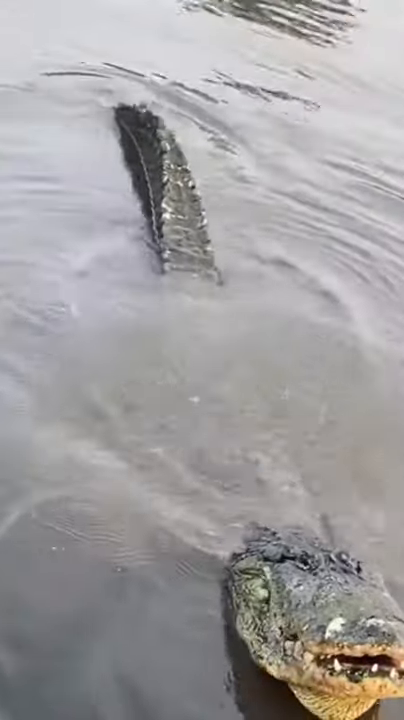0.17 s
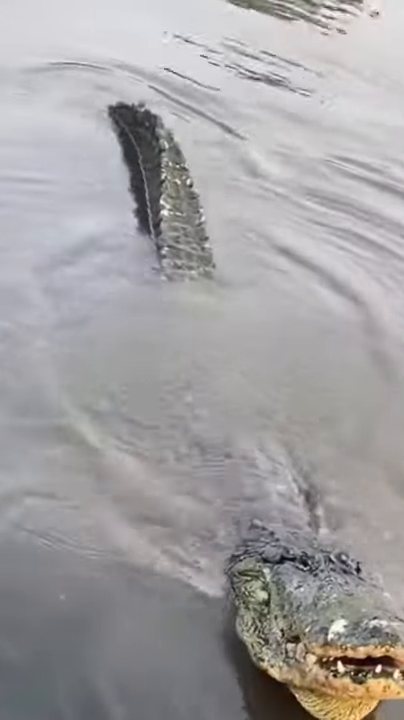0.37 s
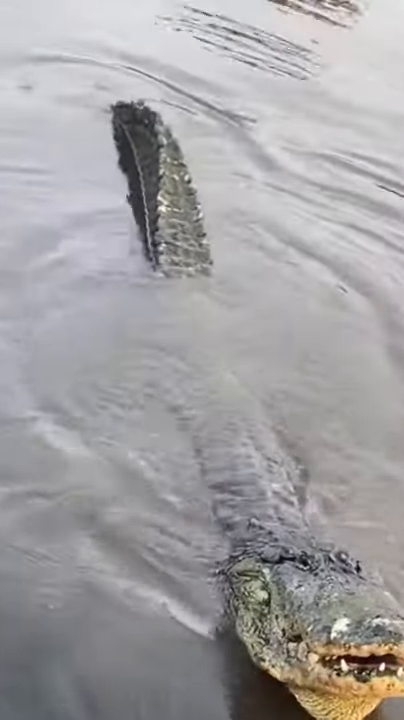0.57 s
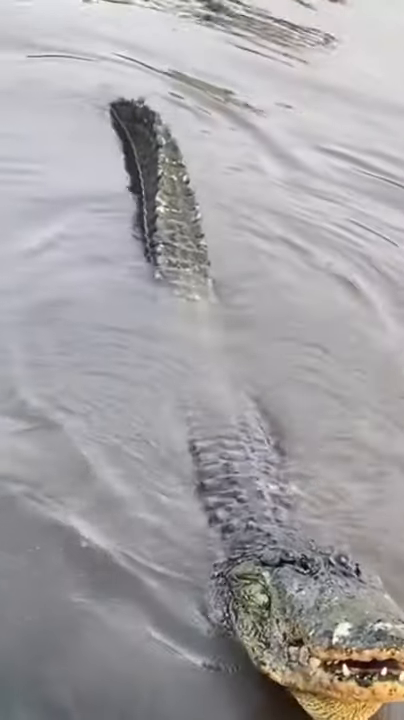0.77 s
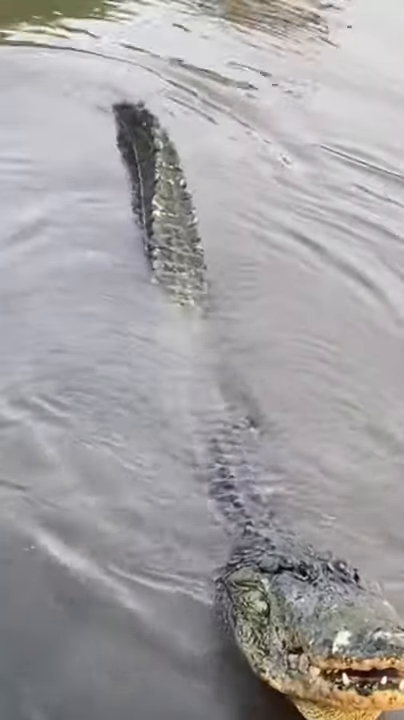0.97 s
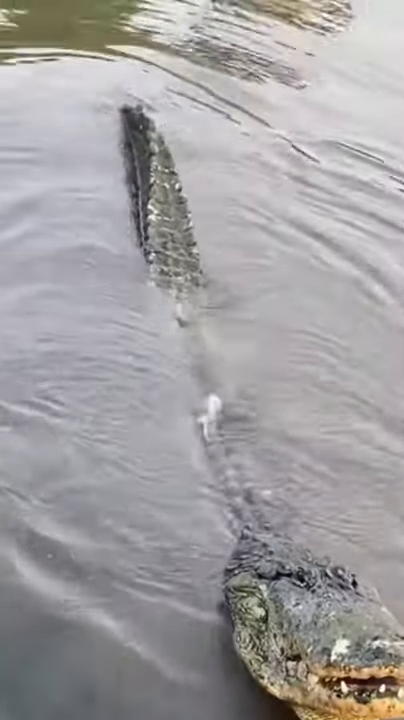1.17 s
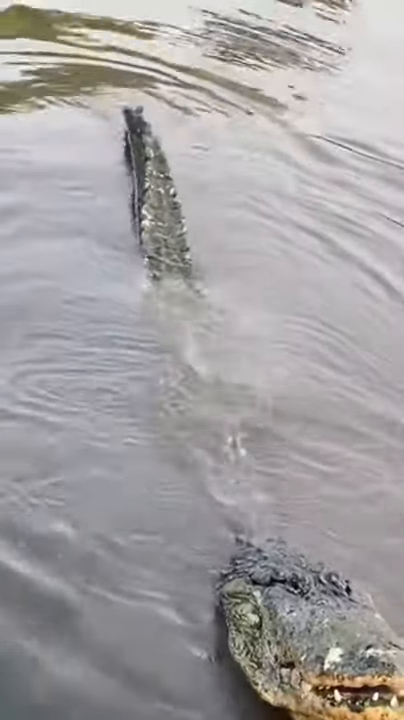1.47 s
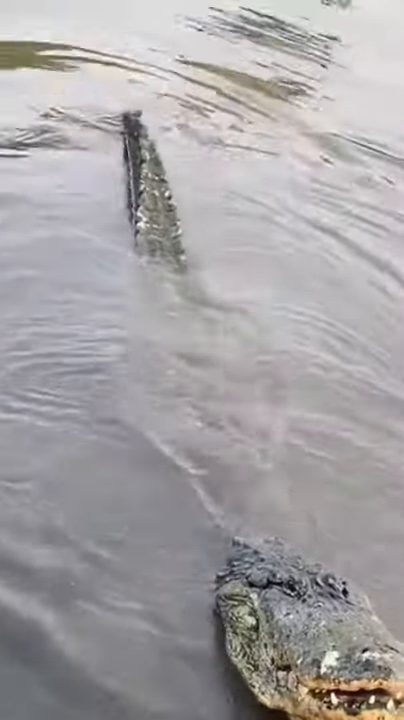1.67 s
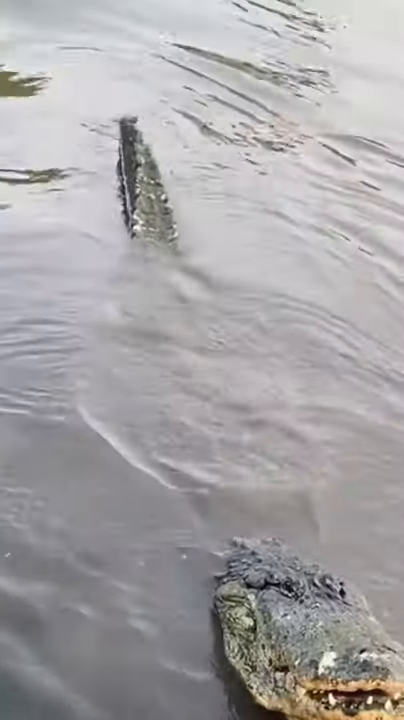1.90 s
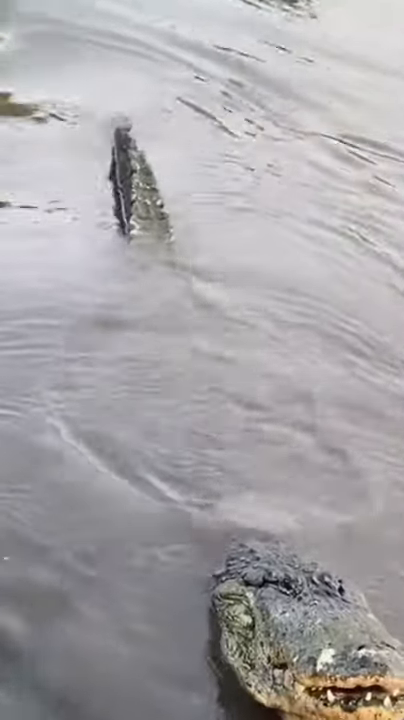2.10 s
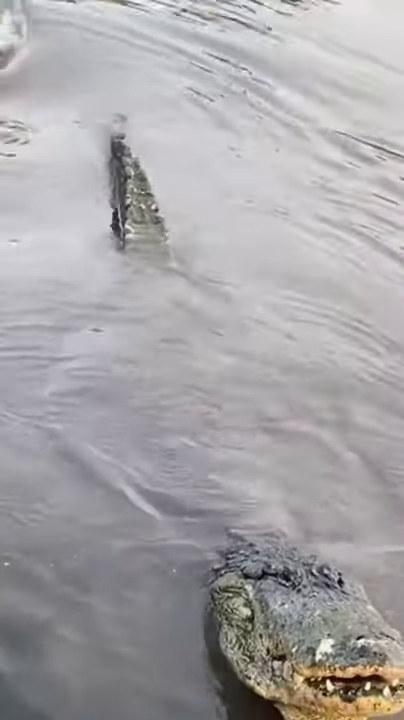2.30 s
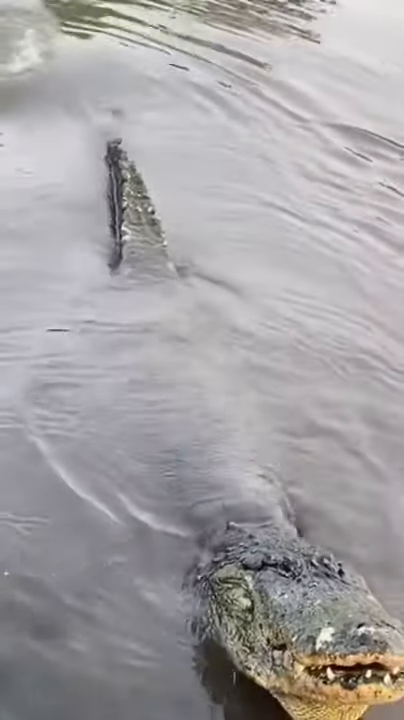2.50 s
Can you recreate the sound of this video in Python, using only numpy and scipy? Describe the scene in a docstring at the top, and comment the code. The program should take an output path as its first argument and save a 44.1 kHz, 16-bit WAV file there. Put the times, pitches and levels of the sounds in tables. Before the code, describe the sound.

An alligator bellows once, a deep throbbing guttural roar with water fizzing over its back

```python
"""A pond, close up: an alligator, half sunk, bellows once over a low rumble.
Its slack vocal folds beat about 17 times a second with weaker flaps between; each beat is an impulse
shaped into a boom that rings chest and throat pouch. Noise puffs rasp through throat resonances, while
hiss, droplets and spits fizz over the back. The roar breaks up into separate gulps, each a short rising ring."""
import sys
import numpy as np
from scipy import signal
from scipy.fft import rfft, irfft, next_fast_len
from scipy.io import wavfile
from scipy.ndimage import uniform_filter1d

SR = 44100
rng = np.random.default_rng(int(sys.argv[2]) if len(sys.argv) > 2 else 0)


def store_pcm(level_fs):
    """Save levels as 16-bit WAV."""
    pcm = np.round(np.clip(level_fs, -1, 1) * 32767).astype(np.int16)
    wavfile.write(sys.argv[1], SR, np.atleast_2d(pcm).T)


N = 116865
T = np.arange(N) / SR  # time of every sample, s

# background rumble: [t/s, level/dB], and its colour: [f/Hz, relative level/dB]
RUMBLE_LEVEL = [(0, -31.5), (2.65, -42)]
RUMBLE_COLOUR = [(15, 7.5), (45, -10), (90, 8.5), (140, -15.5), (260, -22), (550, -28), (1000, -37),
                 (2000, -45), (6000, -55), (13000, -66)]

# deep body tone: [t/s, f/Hz, level/dB]
BODY = [(0, 48.2, -32), (.17, 48.4, -34), (.23, 50.6, -42), (.29, 58.4, -15), (.45, 53.24, -40),
        (1.15, 50.27, -22), (1.72, 43.2, -35.5), (2.46, 43.6, -26.5), (2.56, 42, -63)]
BODY_WAVER_DB, BODY_WAVER_HZ = 3, 24  # rms depth, fastest rate

# airflow: [t/s, throat rasp level/dB, fizz level/dB]
AIRFLOW = [(0, -56, -60.5), (.14, -70, -63.5), (.19, -41.5, -49), (.225, -66, -43.5), (.25, -34, -35.5),
           (.31, -27.5, -34.5), (.38, -25, -25.5), (.55, -27.5, -25), (.85, -26, -27.5), (1.1, -29, -30),
           (1.45, -30, -32.5), (1.64, -28.5, -32.5), (1.72, -33.5, -32.5), (1.765, -38, -40.5),
           (2.05, -37, -48), (2.45, -47.5, -51), (2.65, -57, -53)]
# throat resonances, each passed twice: [f/Hz, half the width of one pass/Hz, relative level/dB]
THROAT = [(794.8, 46, 6.5), (987, 48, -8), (1199, 28, 2), (1511, 69, -3.5), (1911, 34, -7.5),
          (2303, 76, -6.5), (2724, 126, -14), (4074, 220, -12.5), (5410, 320, -17)]
# mouth shift: [t/s, lowest resonance f ratio, its added level/dB, added level of the others/dB]
MOUTH = [(.2, 0.98, 5, 1.5), (1, 1.005, 1.5, 0.5), (1.5, 1.087, 3, 1.5), (2.1, 1.05, -5.5, 0)]
CLAP_DB = -9  # fold claps against the rasp noise
PUFF_S, PUFF_RISE_S, PUFF_DEPTH, RASP_PUFF_POWER = 0.013, 0.0054, 0.42, 1.47
FLUTTER, FLUTTER_HZ = 0.17, 111  # rms depth, fastest rate

# water fizz colour: [f/Hz, relative level/dB]
FIZZ = [(300, 1), (560, -18), (1000, 1), (1750, -4), (2350, -2), (3000, 0.5), (4000, 0), (4900, -6),
        (6000, -7.5), (7000, -10), (9200, -12), (10500, -17), (13000, -25.5)]
# mist that hangs steadily between puffs, its colour: [f/Hz, relative level/dB]
MIST = [(300, -14), (3000, -6.5), (5000, -4), (7000, -3), (9200, -1.5), (10500, -8.5), (13000, -14)]
MIST_DB = -10  # against the fizz level
# stereo width of the spray: [f/Hz, side gain/dB]
SPRAY_WIDTH = [(200, -33), (1000, -69), (2000, -8), (5000, -6.5), (10000, 1.5)]
DROPS_PER_S, DROP_SPREAD_DB, DROP_SHARE = 2600, 2, 0.26
PATCH_DB, PATCH_HZ, PATCH_S = 4.5, 170, .035  # gurgle depth; smoothing across pitch and time

# stirred water lapping: [t/s, level/dB], and its colour: [f/Hz, relative level/dB]
LAP_LEVEL = [(.15, -71), (.5, -48.5)]
LAP_COLOUR = [(300, -18), (490, -1.5), (2000, -10.5), (9000, -30.5)]

# wet spits at the snout: [t/s, level/dB, centre f/Hz, decay/s]
SPITS = [(0.164, -44.5, 890, .018), (0.21, -41, 4530, .008), (.233, -30, 3470, 0.012),
         (.316, -16, 1720, 0.011), (0.526, -19.5, 2720, 0.018), (.591, -17, 2630, 0.0056),
         (0.735, -18, 3000, 0.0068), (1.016, -20.5, 3530, 0.0069)]
SPIT_OCTAVES, SPIT_RISE_S = 0.33, 0.0011  # reach either side of the centre

# single gulps, around and within the rolls: [t/s, level/dB, ring f/Hz, ring time/s, air against gulp/dB]
GULPS = [(0.189, -27.5, 300, 0.012, 0), (.214, -9.5, 278, 0.0052, -6), (0.24, -10.5, 270, 0.005, 6.5),
         (0.248, -15, 96, .012, -15), (0.267, -8, 295, 0.015, -3.5), (0.285, -4.5, 305, 0.011, -13),
         (.295, -14, 98, 0.013, -19), (.320, -5, 300, 0.0026, -1), (0.332, -4.5, 126.4, 0.013, -4),
         (.351, -2, 119, 0.0054, -20), (.372, -15, 106, 0.0058, -17), (.406, -3, 270, 0.0063, -17),
         (.445, -4.5, 134, 0.0049, -19), (.462, -9.5, 280, 0.013, -11), (0.5, -6.5, 188, 0.0072, -3),
         (.535, -12, 116, 0.0094, 1), (0.557, -3, 257, 0.0062, -24), (0.68, -7, 112, 0.0067, -1),
         (0.704, -10, 272, 0.0061, -13), (1.131, -15, 353, 0.01, 0), (1.516, -10, 131, 0.01, -19),
         (1.579, -8, 133, 0.011, -11), (1.623, -13, 131, 0.0039, -15), (1.669, -4.5, 155, 0.0062, -9),
         (1.682, -3.5, 161, 0.006, -2), (1.708, -7.5, 162.6, 0.017, 5), (1.734, -4.5, 201, 0.0037, -0.5),
         (1.797, -6.5, 159.3, 0.01, 0.5), (1.818, -7.5, 261, 0.0049, -2), (1.829, -9.5, 125, 0.0041, -4),
         (1.865, -19.5, 130, 0.0058, 3), (1.892, -9, 141, 0.0098, -1.5), (1.914, -5, 188, 0.0064, -4.5),
         (1.921, -14, 305, 0.0084, -12), (1.951, -20, 120, 0.0077, 4), (1.987, -8.5, 156.8, 0.015, 2),
         (2.010, -8, 177, 0.0056, 0), (2.048, -9.5, 264, 0.0074, -7), (2.094, -8, 148, 0.0087, -4),
         (2.116, -8.5, 175, 0.0082, -10), (2.122, -20, 272, 0.0089, -4), (2.152, -19, 245, 0.016, 3),
         (2.198, -17.5, 330, 0.0087, 2), (2.205, -12.5, 145.2, 0.0069, -14),
         (2.229, -15, 202, 0.0076, -3.5), (2.245, -22, 270, 0.0072, -8), (2.28, -11.5, 147, 0.0071, -3),
         (2.312, -15.5, 145, 0.011, -2), (2.362, -11, 178, 0.007, -3.5), (2.402, -19.5, 177, 0.014, 4.5),
         (2.442, -22.5, 150.6, 0.017, 1), (2.491, -24, 153, 0.019, 3), (2.525, -34, 172, 0.019, -21)]
GULP_RING_DB, GULP_KNOCK_DB, GULP_RISE_OCT_PER_S = -1, -6, 4.7
OVERTONE_HZ, OVERTONE_DB, OVERTONE_RING_S = 348.5, -15, .007  # the ring time is an upper limit
GULP_RASP_DB, GULP_FIZZ_DB, GULP_PUFF_S, GULP_AIR_LEAD_S = -18.5, -22.5, 0.0069, 0.0054
# colour of one beat: [f/Hz, relative level/dB]
BEAT = [(15, -81), (32, -27), (50, 4), (75, 7.5), (125, 10), (190, 1), (260, -4), (350, -12), (400, -15),
        (470, -17), (560, -73), (900, -14), (2000, -86)]
POUCH_HZ, POUCH_WIDTH_HZ = 300, 65  # where the pouch delays the beat

# churning air behind the folds, its colour: [f/Hz, relative level/dB]
TURBULENCE = [(60, -6), (150, -2.5), (260, -1.5), (355, -1), (400, -17), (470, -22), (560, -25),
              (1200, -67)]
TURBULENCE_DB, CHURN_STEADY, GULP_CHURN_DB, CHURN_S = -21.5, 0.56, -2.5, 0.065

# brief barks, each a flaring throat resonance: [t/s, level/dB, f/Hz, ring time/s]
BARKS = [(.264, -23, 1590, 0.0094), (.341, -13, 787, 0.0073), (.359, -21.5, 2379, 0.0069),
         (.794, -19, 796, 0.0091), (1.136, -20, 826, 0.0087), (1.27, -24, 1220, 0.0081),
         (1.443, -20.5, 886, 0.0046), (1.659, -21, 900, .005), (1.817, -24, 820, 0.0058)]
BARK_ROUGH, BARK_ROUGH_HZ = 0.26, 138  # rms depth, fastest rate

# unbroken rolls of the roar: [first beat t/s, last beat t/s, end t/s, level/dB,
# strikes per beat (the strong one included), flap against beat/dB, brightness/dB,
# rebound gain on the squared strikes/dB]
ROLLS = [(0.389, 0.552, 0.56, -2.5, 3, -5, 10, -26), (0.588, 0.694, 0.74, -0.5, 3, -12, 4.5, -22),
         (0.734, 1.018, 1.077, -0.5, 6, -10.5, 3, -10), (1.074, 1.192, 1.245, -1, 4, -5.5, -1.5, -20),
         (1.268, 1.577, 1.576, -1.5, 4, -9.5, -16, -23)]
BEAT_S, SLOWING = .057, 0.00976  # rough beat spacing; each gap grows by this fraction within a roll
BEAT_JITTER_S, FLAP_JITTER_S, FLAP_SPREAD_DB = 0.00038, .001, 1.5  # about rms
# chest resonance: [t/s, f/Hz, gain/dB]
CHEST = [(.3, 102, -15), (.7, 101, -6), (.85, 101, -8), (.98, 104, -11.5), (1.08, 119, -4.5),
         (1.25, 131, -4.5), (1.6, 138, -2.5), (1.7, 159.4, 8)]
CHEST_WIDTH_HZ, ROAR_DB = 27, -1
POUCH_RING_DB, POUCH_RING_HZ, POUCH_RING_WIDTH_HZ = -10, 324, 69
REBOUND_S, REBOUND_HZ, REBOUND_RING_S = .028, 272, 0.0058  # delay, pitch, ring time

# the voice reaches the left port a little louder: [f/Hz, side against mid/dB]
VOICE_LEFT = [(100, -53), (250, -23.5), (700, -19), (1200, -31)]
CUT_HZ = 13300  # top of the band


def amp(db):
    """Decibels to gain."""
    return 10 ** (np.asarray(db) / 20)


def unit(x):
    """Scales to rms 1."""
    return x / np.sqrt(np.mean(x ** 2) + 1e-20)


def noise(*shape):
    """White noise of rms 1."""
    return rng.standard_normal((*shape, N))


def curve(table, axis=1):
    """One column of a time table at every sample."""
    rows = np.array(table)
    return np.interp(T, rows[:, 0], rows[:, axis])


def colour(x, points):
    """Filters by a (Hz, dB) spectrum."""
    size = next_fast_len(N + 8192)
    hz, db = np.transpose(points)
    bins = np.log(np.fft.rfftfreq(size, 1 / SR) + 1)
    gain = amp(np.interp(bins, np.log(hz), db))
    return irfft(rfft(x, size) * gain, size)[..., :N]


def resonate(x, hz, width_hz):
    """A resonance of peak gain about 1 that follows a frequency curve."""
    turn = np.exp(2j * np.pi * np.cumsum(hz * np.ones(N)) / SR)
    r = np.exp(-np.pi * width_hz / SR)
    # shift the resonance down to 0 Hz, smooth, and shift back
    smooth = signal.lfilter([1 - r], [1, -r], x / turn + 1e-18)
    return 2 * (turn * smooth).real


def wobble(hz):
    """Random motion of rms 1, mostly slower than hz."""
    return unit(colour(noise(), [(1, 0), (hz, 0), (2 * hz, -60), (8 * hz, -120)]))


def clicks(times, sizes):
    """Single impulses at the given times."""
    places = np.round(np.asarray(times) * SR).astype(int)
    return np.bincount(np.clip(places, 0, N - 1), sizes, N)


def puffs(train, decay_s):
    """Each impulse opens quickly and dies away."""
    decay = signal.lfilter([1], [1, -np.exp(-1 / (decay_s * SR))], train)
    return uniform_filter1d(decay, max(1, round(PUFF_RISE_S * SR)))


def swell(t, ring_s):
    """A quick swell to 1 at t = 0, then a dying ring."""
    u = np.maximum(t / ring_s + 1, 0)
    return u ** 2 * np.exp(2 * (1 - u))


def rumble():
    """Low background noise that fades gently."""
    return amp(curve(RUMBLE_LEVEL)) * unit(colour(noise(), RUMBLE_COLOUR))


def body():
    """The deep, wavering tone of the trembling trunk."""
    level = amp(curve(BODY, axis=2) + BODY_WAVER_DB * wobble(BODY_WAVER_HZ))
    return np.sqrt(2) * level * np.sin(2 * np.pi * np.cumsum(curve(BODY)) / SR)


def rasp(level, claps):
    """Puffs of air and claps of the folds pass through throat resonances that shift with the mouth."""
    air = (noise() + amp(CLAP_DB) * unit(claps)) * level
    out = np.zeros(N)
    for k, (hz, half_width, db) in enumerate(THROAT):
        if k == 0:
            hz = hz * curve(MOUTH)
            db = db + curve(MOUTH, axis=2)
        else:
            db = db + curve(MOUTH, axis=3)
        once = resonate(air, hz, 2 * half_width)
        out += amp(db) * resonate(once, hz, 2 * half_width)
    return unit(out) * np.sqrt(np.mean(level ** 2))


def fizz(level, mist_level):
    """Hiss, mist, spits and tiny droplets shaken off the water, widest in the treble."""
    falls = rng.random((2, N)) < DROPS_PER_S / SR
    size_db = DROP_SPREAD_DB * np.minimum(rng.exponential(1, (2, N)), 4)
    drops = noise(2) * amp(size_db) * falls
    mix = DROP_SHARE * unit(drops) + (1 - DROP_SHARE) * noise(2)
    hiss = unit(colour(mix, FIZZ)) * level
    mist = unit(colour(noise(2), MIST)) * mist_level
    mid, side = hiss + mist
    mid = gurgle(mid) + spits()
    side = colour(gurgle(side), SPRAY_WIDTH)
    return np.array([mid + side, mid - side])


def gurgle(x):
    """Short-lived random resonances of wet cavities colour the noise."""
    z = signal.stft(x, nperseg=512, noverlap=384)[2]
    field = rng.standard_normal(z.shape[-2:])
    for _ in range(2):
        field = uniform_filter1d(field, round(PATCH_HZ * 512 / SR), 0)
        field = uniform_filter1d(field, round(PATCH_S * SR / 128), 1)
    gain = unit(amp(PATCH_DB * np.clip(unit(field), -2, 2)))
    return signal.istft(z * gain, nperseg=512, noverlap=384)[1][..., :N]


def stirred_water():
    """Soft gurgling wash that swells up and stays after the roar."""
    return amp(curve(LAP_LEVEL)) * unit(gurgle(colour(noise(), LAP_COLOUR)))


def spits():
    """Sudden short bursts of wet noise, each around its own frequency."""
    out = np.zeros(N)
    for s, db, hz, decay_s in SPITS:
        edges = hz * 2 ** np.array([-SPIT_OCTAVES, SPIT_OCTAVES])
        band = signal.butter(2, edges, "band", fs=SR, output="sos")
        envelope = np.clip((T - s) / SPIT_RISE_S, 0, 1) * np.exp(-abs(T - s) / decay_s)
        out += amp(db) * unit(signal.sosfilt(band, noise())) * envelope
    return out


def gulp(t, hz, ring_s):
    """A ring of the throat pouch whose pitch rises as it empties."""
    rise = 1 + np.log(2) * GULP_RISE_OCT_PER_S * t / 2
    return swell(t, ring_s) * np.cos(2 * np.pi * hz * t * rise)


def boom(train):
    """Impulses become rounded low beats; the throat pouch holds back their upper part, so that it rings on."""
    beats = colour(train, BEAT) / colour(clicks([1], [1]), BEAT).max()
    r = np.exp(-np.pi * POUCH_WIDTH_HZ / SR)
    poles = np.array([1, -2 * r * np.cos(2 * np.pi * POUCH_HZ / SR), r * r])
    # an all-pass: it delays without changing the colour
    return signal.lfilter(poles[::-1], poles, beats)


def gulps():
    """Each gulp is one beat and a short, rising ring of the throat pouch with a brief overtone."""
    out = np.zeros(N)
    for s, db, hz, ring_s, _ in GULPS:
        near = abs(T - s) < 8 * ring_s
        t = T[near] - s
        overtone = swell(t, min(ring_s, OVERTONE_RING_S)) * np.sin(2 * np.pi * OVERTONE_HZ * t)
        out[near] += amp(db + GULP_RING_DB) * (gulp(t, hz, ring_s) + amp(OVERTONE_DB) * overtone)
    s, db = np.transpose(GULPS)[:2]
    return out + amp(GULP_KNOCK_DB) * boom(clicks(s, amp(db)))


def turbulence(push, rolling):
    """Low noise of air churning behind the folds, pushed by beats and gulps."""
    s, db = np.transpose(GULPS)[:2]
    churn = push + CHURN_STEADY * rolling + puffs(clicks(s, amp(db + GULP_CHURN_DB)), CHURN_S)
    return amp(TURBULENCE_DB) * unit(colour(noise(), TURBULENCE)) * churn


def barks():
    """Rough, short flares of single throat resonances."""
    out = np.zeros(N)
    rough = 1 + BARK_ROUGH * (wobble(BARK_ROUGH_HZ) + 1j * wobble(BARK_ROUGH_HZ))
    for s, db, hz, ring_s in BARKS:
        near = abs(T - s) < 8 * ring_s
        t = T[near] - s
        tone = (rough[near] * np.exp(2j * np.pi * hz * t)).real
        out[near] += amp(db) * swell(t, ring_s) * tone
    return out


def folds(first, last, end, db, flaps, flap_db):
    """One roll: strong, slowly spreading beats with weak uneven flaps between them."""
    beats = round((last - first) / BEAT_S)
    edges = np.cumsum(np.r_[0, (1 + SLOWING) ** np.arange(beats + 2)])
    k = np.arange((beats + 2) * flaps)
    late, size = rng.uniform(-1.7, 1.7, (2, len(k)))
    strong = (k % flaps == 0) & (k <= beats * flaps)
    progress = np.interp(k / flaps, np.arange(beats + 3), edges / edges[beats])
    times = first + (last - first) * progress
    sizes = (times < end) * amp(db + np.where(strong, 0, flap_db + FLAP_SPREAD_DB * size))
    return clicks(times + late * np.where(strong, BEAT_JITTER_S, FLAP_JITTER_S), sizes)


def roar(trains, split_hz=210):
    """The beats boom and ring the chest and throat pouch; each roll has its own brightness."""
    low = signal.butter(2, split_hz, fs=SR, output="sos")
    out = np.zeros(N)
    for train, row in zip(trains, ROLLS):
        beats = boom(train)
        bass = signal.sosfiltfilt(low, beats)
        out += bass + amp(row[-2]) * (beats - bass)
    pouch = amp(POUCH_RING_DB) * resonate(out, POUCH_RING_HZ, POUCH_RING_WIDTH_HZ)
    chest = amp(curve(CHEST, axis=2)) * resonate(out, curve(CHEST), CHEST_WIDTH_HZ)
    return amp(ROAR_DB) * (out + pouch + chest)


def rebounds(trains):
    """The pouch springs back about halfway between two strong beats."""
    kicks = sum(amp(row[-1]) * train ** 2 for train, row in zip(trains, ROLLS))
    ring = gulp(T[:SR // 10] - REBOUND_S, REBOUND_HZ, REBOUND_RING_S)
    return signal.oaconvolve(kicks, ring)[:N]


def scene():
    """The voice near the centre, spray around it, rumble behind."""
    trains = [folds(*row[:-2]) for row in ROLLS]
    strikes = sum(trains)
    push = puffs(strikes, PUFF_S)
    rolling = uniform_filter1d(1. * (push > .01), size=1500)  # about 1 while a roll lasts
    # the beats make the airflow throb around its set level
    throb = 1 + PUFF_DEPTH * (push / push[push > .01].mean() - rolling)
    throb = throb * (1 + FLUTTER * wobble(FLUTTER_HZ))
    s, db, _, _, air_db = np.transpose(GULPS)
    gulp_air = puffs(clicks(s - GULP_AIR_LEAD_S, amp(db + air_db)), GULP_PUFF_S)

    rasp_level = amp(curve(AIRFLOW)) * abs(throb) ** RASP_PUFF_POWER + amp(GULP_RASP_DB) * gulp_air
    voice = rasp(rasp_level, strikes) + gulps() + turbulence(push, rolling) + barks()
    voice = voice + roar(trains) + rebounds(trains)
    side = colour(voice, VOICE_LEFT)

    wet = amp(curve(AIRFLOW, axis=2))
    spray = fizz(wet * throb + amp(GULP_FIZZ_DB) * gulp_air, wet * amp(MIST_DB))
    centre = rumble() + body() + stirred_water()
    return np.array([voice + side, voice - side]) + spray + centre


def record(dry):
    """The loudest peaks are rounded off; then the band limit."""
    held = dry / (1 + dry ** 8) ** (1 / 8)
    band = signal.firwin(401, CUT_HZ, window=("kaiser", 9), fs=SR)
    return signal.oaconvolve(held, band[None], "same")


dry = scene()
out = record(dry)
store_pcm(out)
```